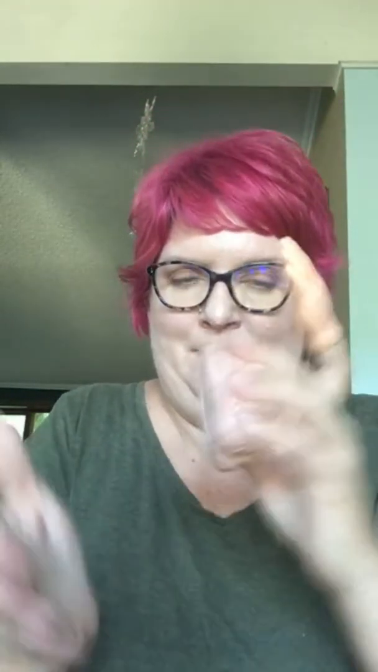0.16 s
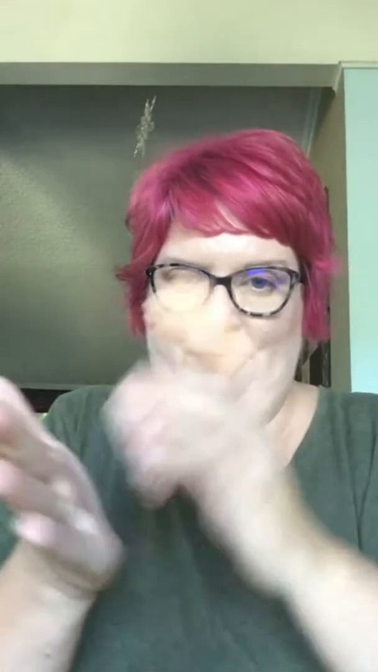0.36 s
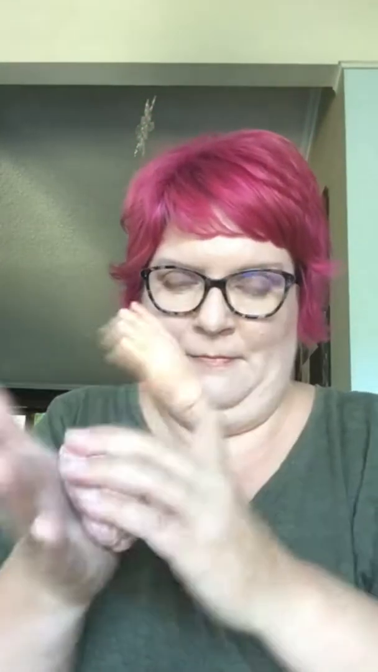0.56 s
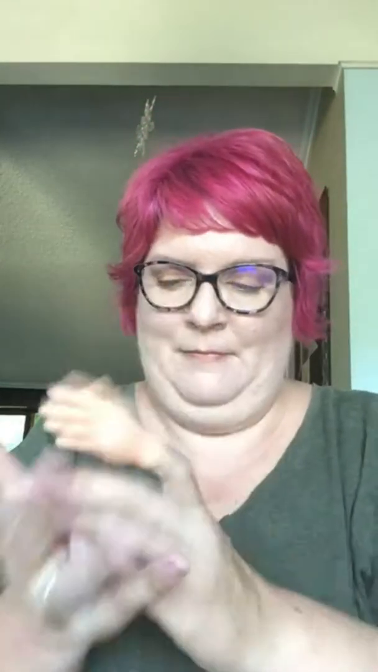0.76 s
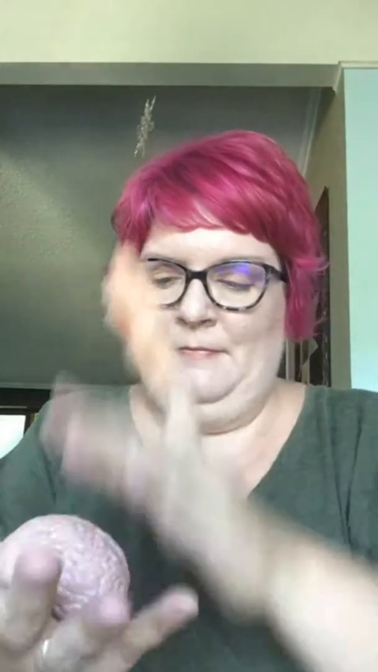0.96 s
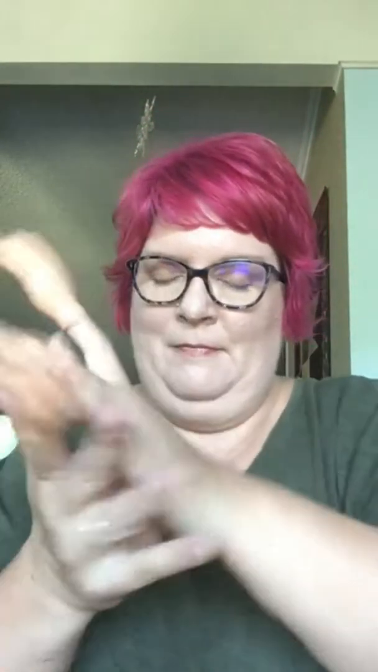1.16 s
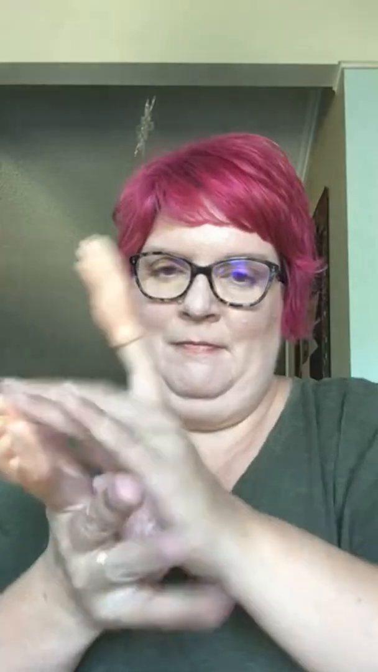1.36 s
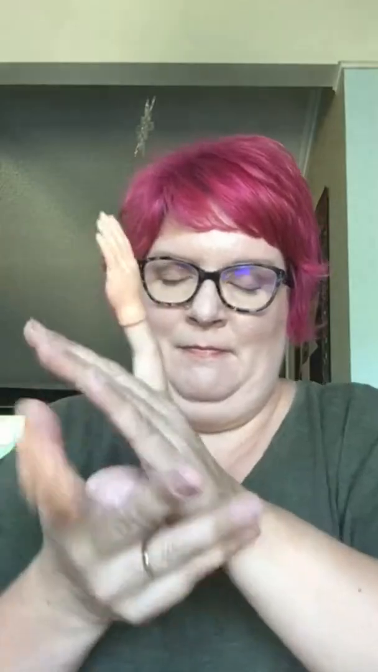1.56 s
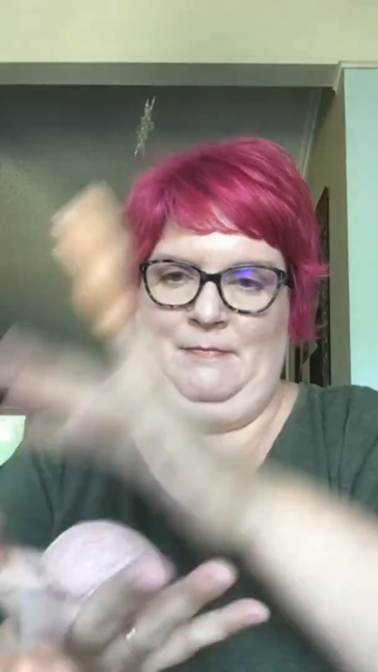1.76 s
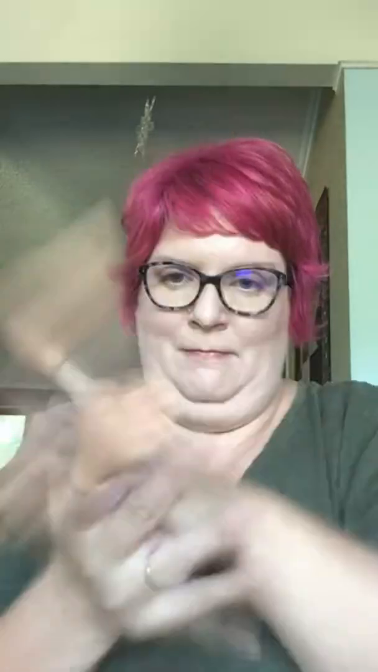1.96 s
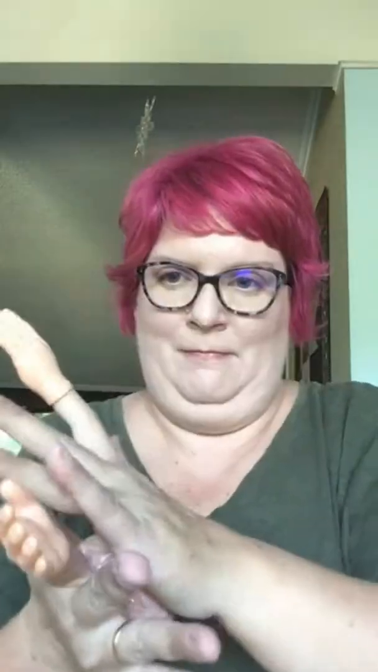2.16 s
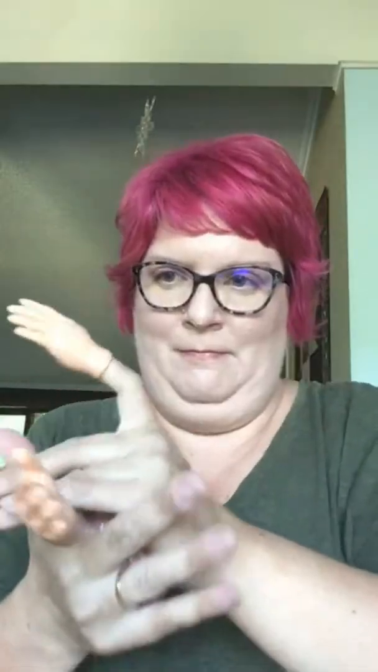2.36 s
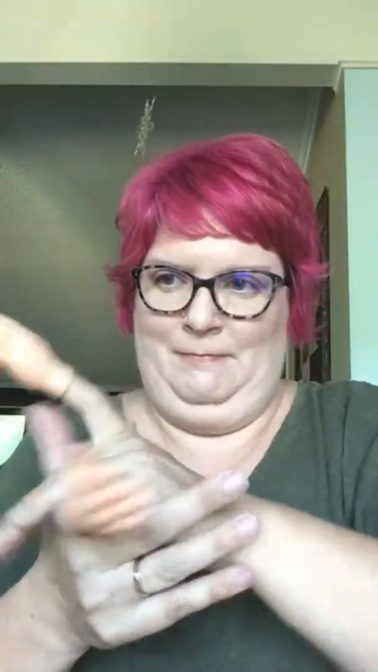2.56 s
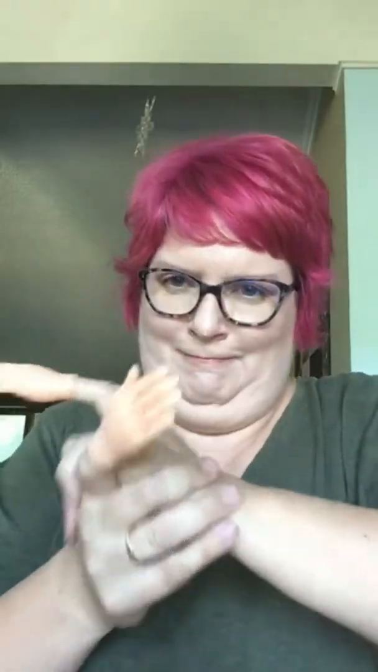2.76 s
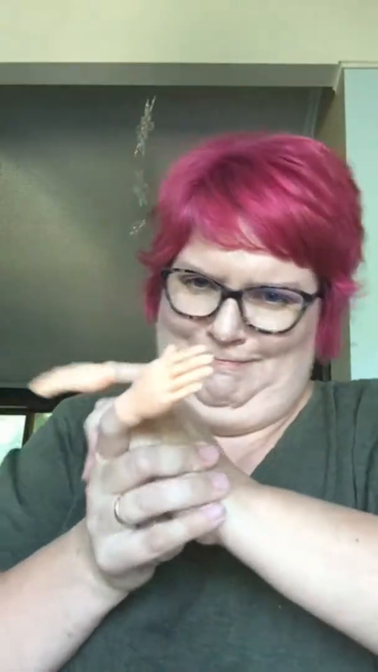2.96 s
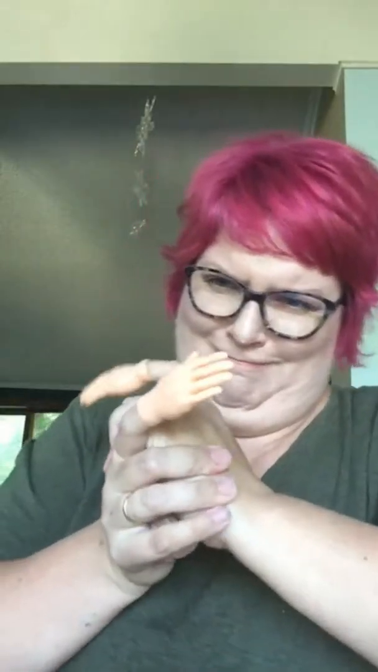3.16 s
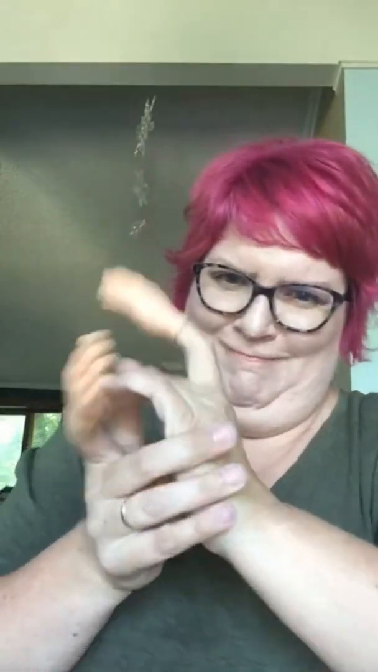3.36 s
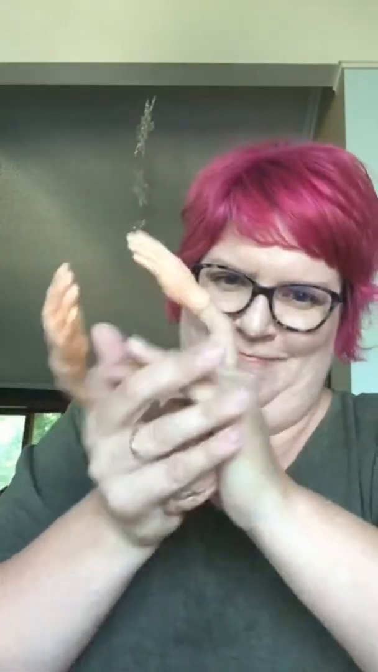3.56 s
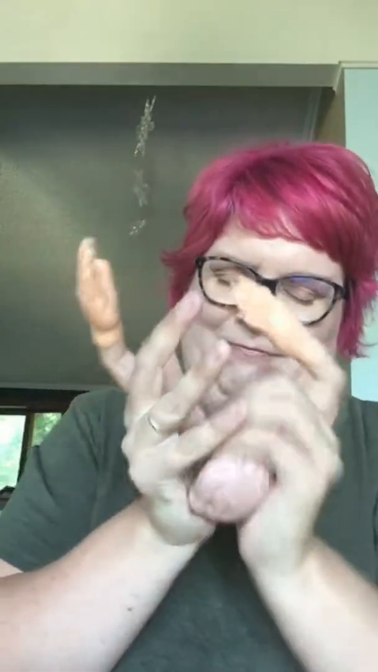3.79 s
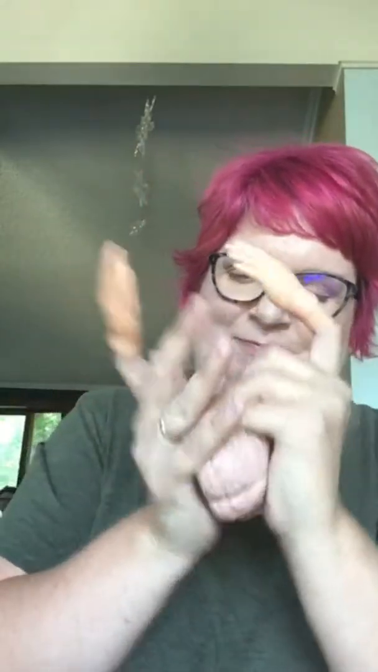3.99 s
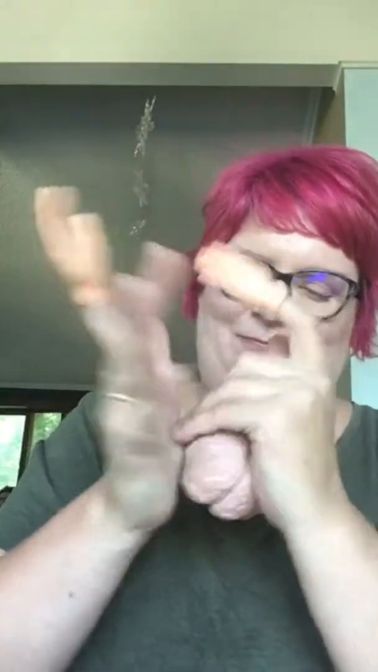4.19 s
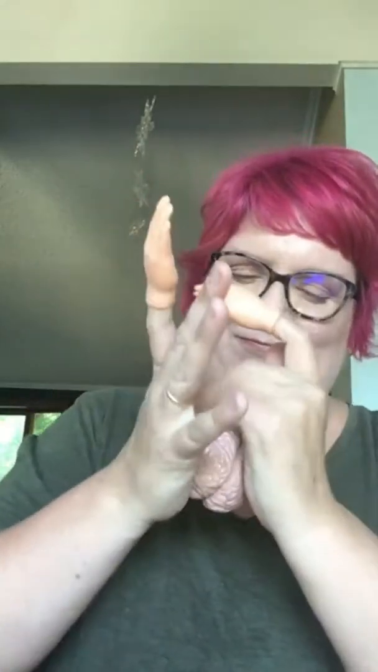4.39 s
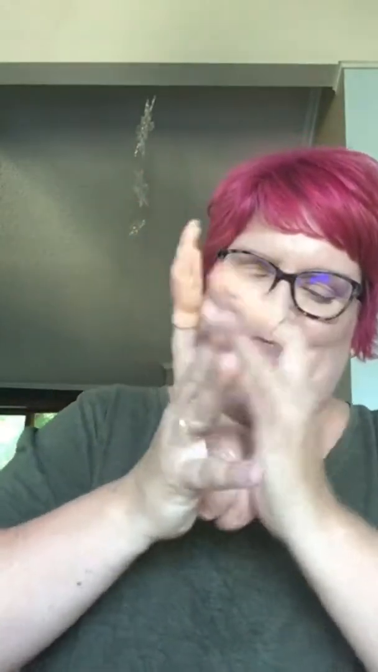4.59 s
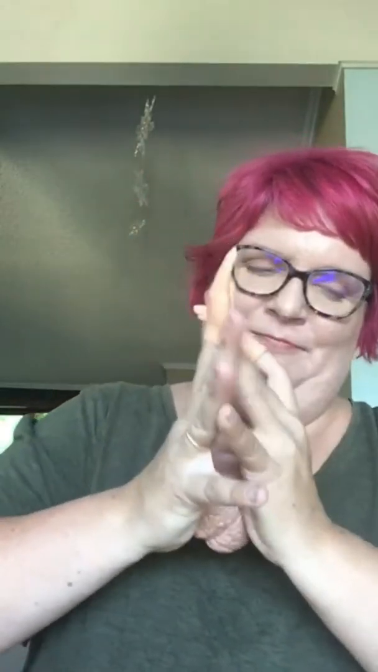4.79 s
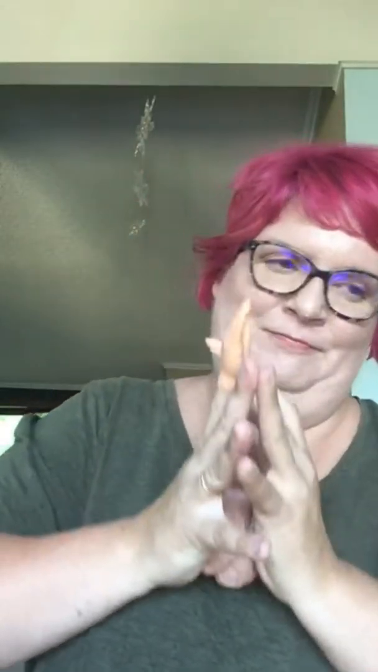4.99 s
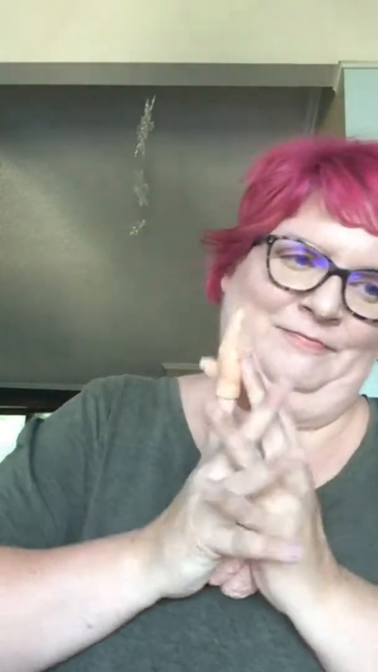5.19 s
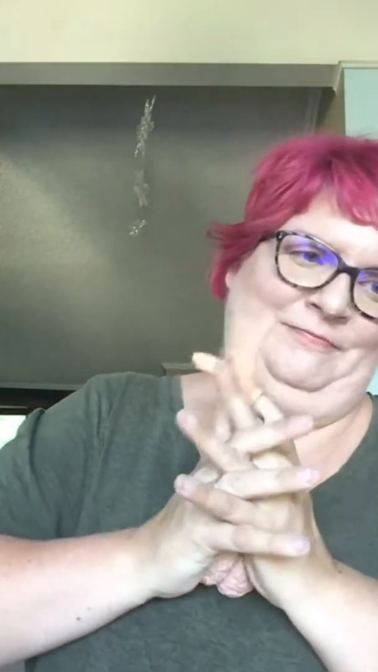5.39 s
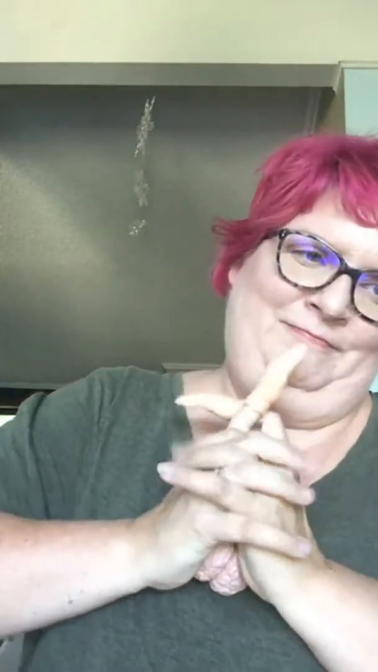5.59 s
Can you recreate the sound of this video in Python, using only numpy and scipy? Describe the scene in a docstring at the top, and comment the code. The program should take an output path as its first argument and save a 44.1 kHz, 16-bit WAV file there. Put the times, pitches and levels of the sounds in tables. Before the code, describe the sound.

Close, wet-sounding slaps and hollow pops as a soft sticky rubber ball is tossed between hands, then faint squeaky kneading in a quiet room.

```python
"""In a small, quiet room, a soft, tacky toy ball is tossed from hand to hand close to a phone and kneaded.
Each smack, from a catch or once while kneading, layers a noise patter of skin, a noise crack of escaping
air, a hollow pop that sags in pitch as the ball flattens, and a faint fizz of clinging skin. Around them
the rubber rubs and ticks in shaped noise, and squelches through a resonant pocket. Echoes, a diffuse tail
and room modes follow; low rumble, hiss and thin whines lie beneath, and loud peaks raise extra hiss."""
import sys
import numpy as np
from scipy import signal
from scipy.fft import rfft, irfft, next_fast_len
from scipy.io import wavfile
from scipy.ndimage import uniform_filter1d

SR = 44100
rng = np.random.default_rng(int(sys.argv[2]) if len(sys.argv) > 2 else 0)


def wav_out(sig):
    """Save sig, one row per channel (or a flat mono array), as 16-bit PCM at SR to the path in sys.argv[1]."""
    wavfile.write(sys.argv[1], SR, np.round(np.clip(np.atleast_2d(sig).T, -1, 1) * 32767).astype(np.int16))


N = 248745  # length in samples
AGE = np.arange(SR // 4) / SR  # time since an event began, s
TOP_HZ = 15800  # upper limit of the sound

# Relative spectrum of skin and air slapping on rubber: pitch_hz [Hz], level_db [dB per Hz]
SLAP_SPECTRUM = [(100, -3.5), (300, -4.5), (580, 4.5), (750, -0.5), (1100, -2), (1600, -8), (2200, -4.5),
                 (3000, -6), (3800, -6.5), (4500, -13.5), (5300, -7.5), (7500, -12), (10400, -12.5),
                 (15500, -10.5)]
# Relative spectrum of skin rubbing on rubber: pitch_hz [Hz], level_db [dB per Hz]
RUB_SPECTRUM = [(300, -2.5), (1000, -10), (1800, -6.5), (3000, -8.5), (4800, -15.5), (6500, -4.5),
                (8000, -7), (9200, -1.5), (10400, -6), (12000, 3.5), (13500, 3), (15500, 1.5)]


def smacks(patter_s=.0047, patter_db=-13, patter_tilt_db=0.0, pop_after_s=.0022,
           cling_after_s=.008, cling_s=.0042, cling_tilt_db=1):
    """Skin patters onto rubber, air cracks out, the pocket pops, and the tacky skin fizzes as it spreads."""
    # Smacks of air trapped between ball and palm: catches, and one small smack while kneading.
    # start_s [s], closing_s (time the gap takes to close) [s], crack_db [dB], tilt_db [dB per octave],
    # gap_hz (air gap) [Hz], pop_hz [Hz], force_db [dB], squash [0-1], cling_db [dB]
    smack_list = [(0.3337, .0041, -12.5, -0.55, 1154, 325, -11.5, 0.13, -45),
                  (0.5937, .0031, -5, 0.5, 3538, 312, -17.5, 0.13, -66),
                  (0.8107, .0015, -23, -1.7, 1000, 346, -17, 0.18, -61),
                  (1.2147, 0.001038, -21, -2.5, 910, 920, -20, 0.53, -36),
                  (2.0579, .0006, -10.5, -0.5, 1150, 980, -8, 0.53, -31.5),
                  (4.1545, 0.00019, -29, 1.6, 2546, 1230, -32.5, 0.16, -70)]
    out = np.zeros(N)
    for start_s, closing_s, crack_db, tilt_db, gap_hz, pop_hz, force_db, squash, cling_db in smack_list:
        # a flat-topped envelope with a quick end
        patter = burst(np.exp(-(AGE / patter_s) ** 4), SLAP_SPECTRUM, patter_tilt_db)
        cling = burst(swell(cling_s), RUB_SPECTRUM, cling_tilt_db)
        add(out, start_s, amp(force_db + patter_db) * patter)
        add(out, start_s + closing_s, amp(crack_db) * crack(tilt_db, gap_hz, squash))
        add(out, start_s + pop_after_s, amp(force_db) * pop(pop_hz, squash))
        add(out, start_s + cling_after_s, amp(cling_db) * cling)
    return out


def crack(tilt_db, gap_hz, squash, decay_s=0.00054, decay_s_per_squash=.0032, gap_db=7):
    """Air cracks out of the closing gap, for longer when the ball flattens more."""
    envelope = np.exp(-AGE / (decay_s + decay_s_per_squash * squash))
    return burst(envelope, SLAP_SPECTRUM, tilt_db, gap_hz, gap_db)


def pop(hz, squash, cycles_per_squash=7.57, thud_hz=170, thud_sag=0.47, thud_s=0.0065,
        thud_db=-21, thud_db_per_squash=21):
    """Trapped air pops over the soft mass's thud; a flatter ball sags further and longer in pitch."""
    pocket = sagging(hz, squash, cycles_per_squash * squash / hz)
    thud = sagging(thud_hz, thud_sag, thud_s)
    return pocket + amp(thud_db + thud_db_per_squash * squash) * thud


def sagging(hz, sag, swell_s):
    """A short swell of pressure whose period grows with each cycle."""
    turns = np.log1p(sag * hz * AGE) / sag
    return -swell(swell_s) * np.sin(2 * np.pi * turns)


def kneading(lead_s=.02):
    """Fingers drag over the skin; when they press in, the filling gives way just after rubbing starts."""
    # Fingers press in and the filling shifts: squelch_start_s [s], rub_length_s [s], rub_db [dB],
    # pocket_hz [Hz], swell_s [s], squelch_db [dB]
    squeezes = [(0.053, 0.12, -62, 775, 0.0067, -50.5), (2.495, 0.084, -62.5, 383, 0.0022, -52.5),
                (3.533, 0.12, -60.5, 1030, 0.01, -52.5), (3.611, 0.058, -60, 650, 0.011, -59),
                (3.977, 0.051, -51, 434, 0.0085, -50), (4.494, .076, -48.5, 690, 0.012, -55),
                (4.888, .12, -62.5, 720, 0.0035, -54.5)]
    # Fingers slide over the rubber without pressing: start_s [s], length_s [s], level_db [dB]
    slides = [(0.879, 0.086, -60.5), (1.318, 0.073, -61), (2.609, .1, -59), (2.732, 0.076, -61),
              (3.383, 0.087, -50), (3.871, 0.052, -57.5), (4.699, .12, -58.5), (5.22, 0.12, -59.5)]
    out = np.zeros(N)
    for start_s, length_s, level_db in slides:
        add(out, start_s, amp(level_db) * rub(length_s))
    for start_s, length_s, rub_db, pocket_hz, swell_s, squelch_db in squeezes:
        add(out, start_s - lead_s, amp(rub_db) * rub(length_s))
        add(out, start_s, amp(squelch_db) * squelch(pocket_hz, swell_s))
    return out


def rub(length_s, tilt_db=0.2):
    """One stroke of a finger over the rubber: a swell of tiny slips, each at its own level."""
    slips_per_s, slip_spread_db = 2000, 3.5
    stroke = np.sin(np.pi * np.minimum(AGE / length_s, 1)) ** 2
    slip_number = (AGE * slips_per_s).astype(int)
    slips = amp(slip_spread_db * rng.standard_normal(len(AGE))[slip_number])
    slips = slips / np.sqrt(np.mean(slips ** 2))
    return burst(stroke * slips, RUB_SPECTRUM, tilt_db)


def squelch(hz, swell_s, width=0.41):
    """The filling shifts and a pocket inside the ball resonates."""
    edge = 1 + width
    pocket = [(hz / 4, -24), (hz / edge, -13), (hz, 0), (hz * edge, -13), (hz * 3, -22), (hz * 10, -38)]
    return burst(swell(swell_s), pocket)


def fidgeting(first_s=3.5, stroke_s=.07, stroke_db=-66, spread_db=4.0, count=10):
    """In the later part, the fingers keep shifting lightly at uneven moments and levels."""
    out = np.zeros(N)
    step_s = (N / SR - first_s) / count
    for k in range(count):
        start_s = first_s + (k + rng.random()) * step_s
        level_db = stroke_db + spread_db * rng.standard_normal()
        add(out, start_s, amp(level_db) * rub(stroke_s))
    return out


def ticks(swell_s=0.0021, ring_db=9, below_db=-15, above_db=-12):
    """Tacky skin lets go; each tick centres on the pitch of the patch that comes free."""
    # Small ticks of skin letting go: start_s [s], level_db [dB], pitch_hz [Hz]
    releases = [(0.131, -45.5, 13600), (.143, -51, 6100), (1.481, -52, 830), (2.906, -56.5, 9900),
                (3.399, -48.5, 6500), (3.932, -51, 1210), (4.496, -56, 3900), (5.223, -46, 3800),
                (5.501, -45.5, 740)]
    out = np.zeros(N)
    for start_s, level_db, pitch_hz in releases:
        patch = [(pitch_hz / 4, below_db), (pitch_hz, 0), (pitch_hz * 4, above_db)]
        tick = burst(swell(swell_s), patch, hz=pitch_hz, boost_db=ring_db)
        add(out, start_s, amp(level_db) * tick)
    return out


def room(x, first_s=0.0045, build_s=0.0017):
    """A few near echoes, a diffuse tail whose bands fade at their own rates, and standing waves."""
    # Nearby surfaces: delay_s [s], level_db [dB]
    echoes = [(.0088, -24.5), (0.0149, -18), (0.0181, -20.5)]
    # Diffuse tail by band: centre_hz [Hz], level_db [dB], t60_s (time to fall 60 dB) [s]
    tail_bands = [(75.6, -10, 0.14), (149.7, -18, 0.56), (300, -16, 0.32), (560, -9, 0.34),
                  (1296, -7, 0.42), (2217, -9, 0.38), (4300, -10, 0.38), (8580, -11, 0.21),
                  (15100, -14.5, 0.19)]
    # Narrow room resonances: pitch_hz [Hz], level_db [dB], t60_s [s]
    modes = [(133, -2.5, 0.14), (640, -22, .36), (1110, -5.5, 0.49), (1950, -6, .45)]
    t = np.arange(SR * 2 // 3) / SR
    onset = 1 - np.exp(-np.maximum(t - first_s, 0) / build_s)
    response = np.zeros(N)
    for hz, level_db, t60_s in tail_bands:
        band = [(hz / 3, -40), (hz / 1.7, -8), (hz / 1.2, 0), (hz * 1.2, 0), (hz * 1.7, -8), (hz * 3, -40)]
        fade = onset * np.exp(-np.log(1000) * t / t60_s)
        tail = burst(fade, band)
        share = np.sqrt(np.mean(contour(len(t), band) ** 2))  # wider bands carry more power
        add(response, 0, amp(level_db) * share * tail / np.linalg.norm(tail))
    for delay_s, level_db in echoes:
        response[int(delay_s * SR)] += amp(level_db)
    for hz, level_db, t60_s in modes:
        fade = onset * np.exp(-np.log(1000) * t / t60_s)
        wave = 2 * np.cos(2 * np.pi * hz * t)
        add(response, 0, amp(level_db) * wave * fade / fade.sum())
    return x + signal.fftconvolve(x, response[:SR])[:N]


def background(quiet_db=-59, whine_trim_db=-4.0, waver_db=2):
    """Steady noise gives low rumble and soft hiss; thin sine tones waver slowly in level."""
    # Relative spectrum of the quiet room: pitch_hz [Hz], level_db [dB per Hz]
    quiet_spectrum = [(25, -2), (80, -6), (140, -17.5), (300, -17), (600, -23.5), (1100, -27.5),
                      (1750, -29.5), (2600, -28.5), (4800, -34.5), (6200, -33), (8400, -29), (10400, -41),
                      (12500, -35), (15500, -37)]
    # Faint electrical whine: pitch_hz [Hz], level_db (before trim and waver) [dB]
    whines = [(5949, -77.5), (6616, -87.5), (6821, -77), (7461, -86), (7682, -89.5), (8317, -76.5)]
    t = np.arange(N) / SR
    out = amp(quiet_db) * hiss(quiet_spectrum)
    for pitch_hz, level_db in whines:
        waver = np.interp(t, np.linspace(0, t[-1], 10), rng.standard_normal(10))
        tone = np.sqrt(2) * np.sin(2 * np.pi * pitch_hz * t)
        out += amp(level_db + whine_trim_db + waver_db * waver) * tone
    return out


def hiss(points):
    """Steady noise of a given spectrum, rms 1."""
    x = irfft(rfft(rng.standard_normal(N)) * contour(N, points), N)
    return x / x.std()


def burst(envelope, points, tilt_db=0, hz=1000, boost_db=0):
    """Noise under an envelope, evened out to a spectrum by a causal filter; keeps the envelope's energy."""
    size = next_fast_len(len(envelope) + SR // 50, real=True)  # leaves room for ringing
    smooth_bins = 110 * size // SR  # about 110 Hz
    spectrum = rfft(envelope * rng.standard_normal(len(envelope)), size)
    power = uniform_filter1d(np.abs(spectrum) ** 2, smooth_bins)
    gain = contour(size, points, tilt_db, hz, boost_db) / np.sqrt(power)
    # minimum phase: the filter rings after the noise, never before it
    cepstrum = irfft(np.log(gain), size)
    causal_filter = np.exp(rfft(2 * cepstrum[:size // 2], size))
    x = irfft(spectrum * causal_filter, size)
    return x * np.linalg.norm(envelope) / np.linalg.norm(x)


def contour(size, points, tilt_db=0, hz=1000, boost_db=0, width=0.25):
    """Gain per frequency bin: a spectrum, a tilt per octave, one resonance and a roll-off at the top."""
    at_hz, level_db = np.transpose(points)
    octave = np.log2(np.maximum(np.fft.rfftfreq(size, 1 / SR), 1))
    resonance = boost_db / (1 + ((octave - np.log2(hz)) / width) ** 2)  # width in octaves
    above_top = np.maximum(octave - np.log2(TOP_HZ), 0)
    shape_db = np.interp(octave, np.log2(at_hz), level_db)
    return amp(shape_db + tilt_db * octave + resonance) * np.exp(-10 * above_top)


def swell(peak_s):
    """A smooth rise to one and a longer fall."""
    return (AGE / peak_s * np.exp(1 - AGE / peak_s)) ** 2


def amp(db):
    """Decibels to gain."""
    return 10 ** (np.asarray(db) / 20)


def add(track, start_s, sound):
    """Mix a sound into the track at a time."""
    start = max(int(start_s * SR), 0)
    track[start:start + len(sound)] += sound[:N - start]


def scene():
    """The hands and ball ring in the room, over the background."""
    hands = smacks() + ticks() + kneading() + fidgeting()
    return (room(hands) + background())[None]


def record(dry, hiss_db=-60):
    """A loud peak switches the phone to a hissier input range for a moment; the top is cut."""
    overload, hold = .48, int(.41 * SR)  # peak level, samples of added hiss
    loud = 1. * (np.abs(dry[0]) > overload)
    hissy = signal.fftconvolve(loud, np.ones(hold))[:N] > .5
    range_hiss = hiss([(200, 6.0), (3000, 5), (8000, -0.5), (15000, -7.5)])
    sound = dry + amp(hiss_db) * hissy * range_hiss
    top_cut = signal.ellip(8, .2, 70, TOP_HZ, fs=SR, output="sos")
    return signal.sosfilt(top_cut, np.clip(sound, -1, 1))


dry = scene()
out = record(dry)
wav_out(out)
```